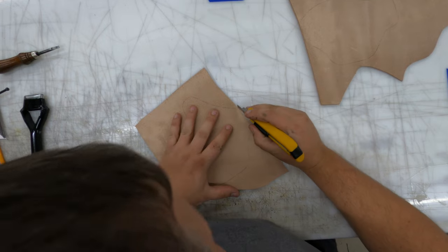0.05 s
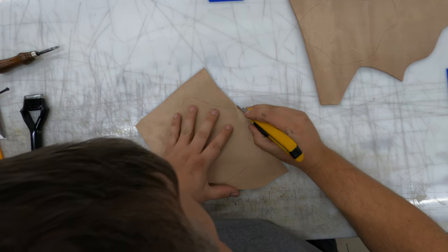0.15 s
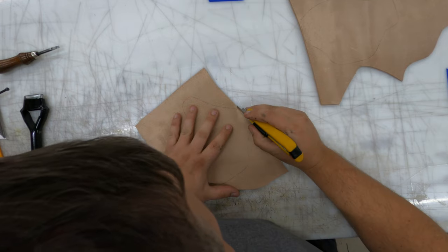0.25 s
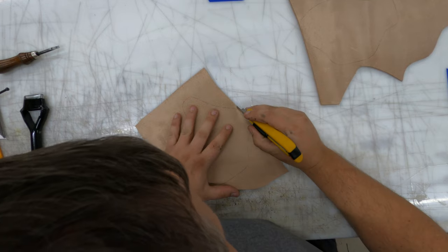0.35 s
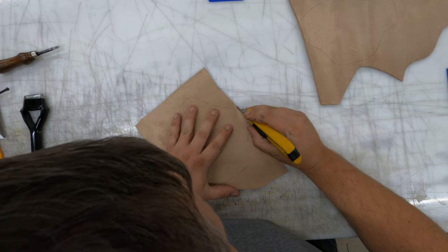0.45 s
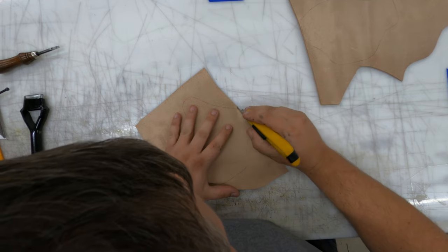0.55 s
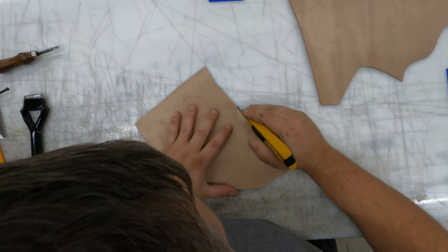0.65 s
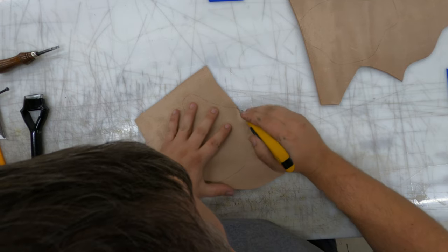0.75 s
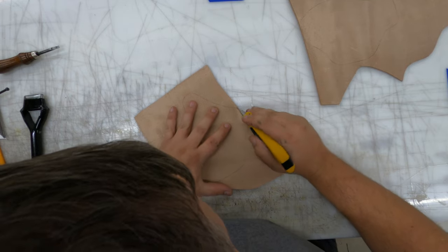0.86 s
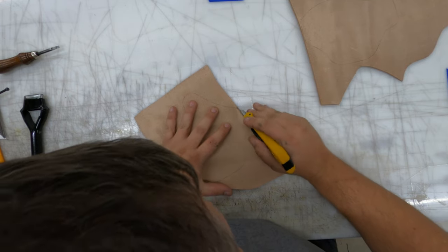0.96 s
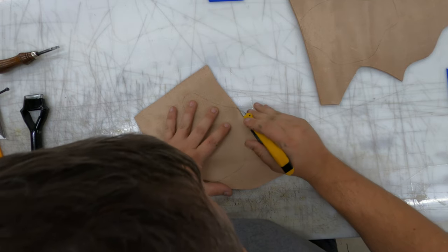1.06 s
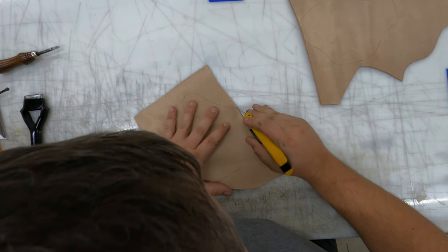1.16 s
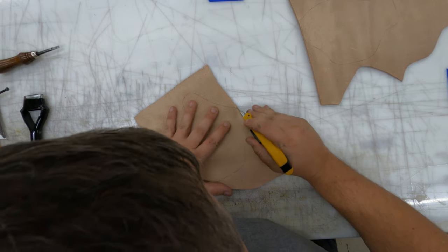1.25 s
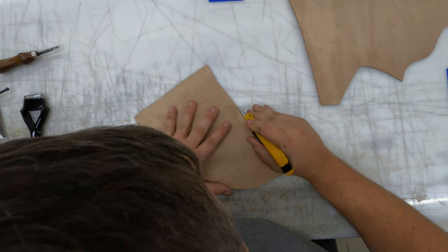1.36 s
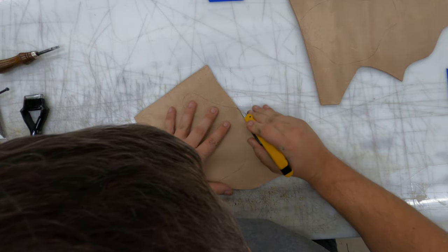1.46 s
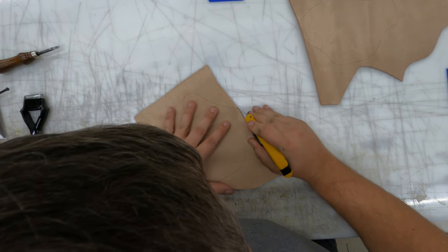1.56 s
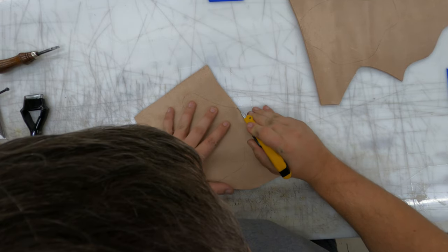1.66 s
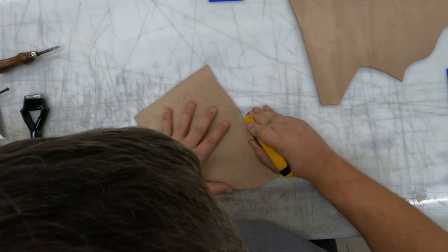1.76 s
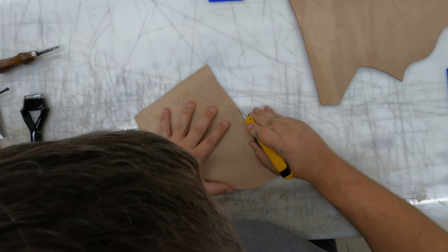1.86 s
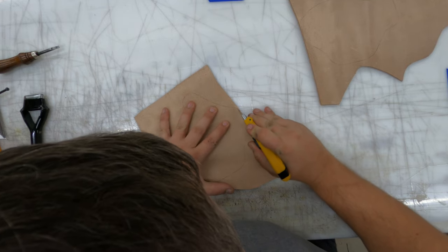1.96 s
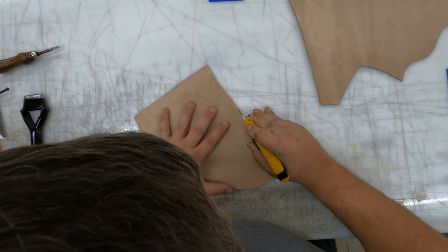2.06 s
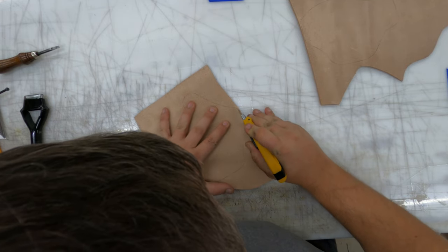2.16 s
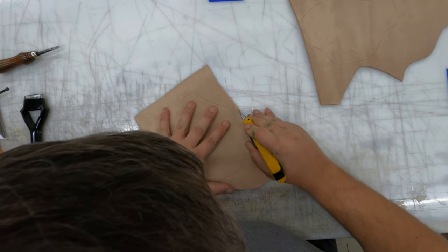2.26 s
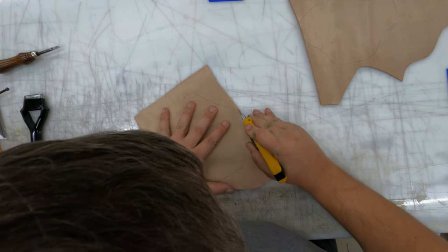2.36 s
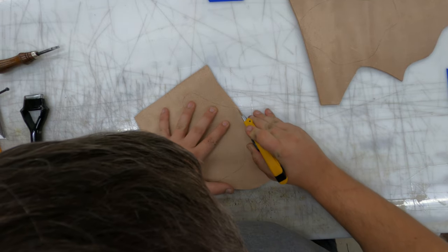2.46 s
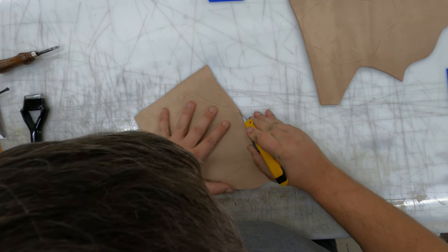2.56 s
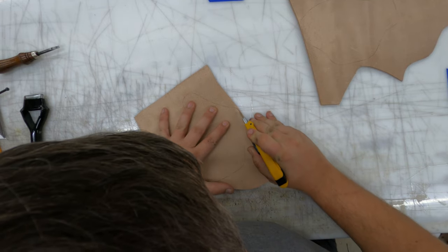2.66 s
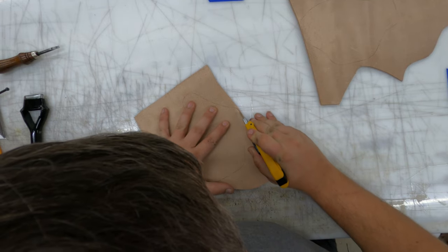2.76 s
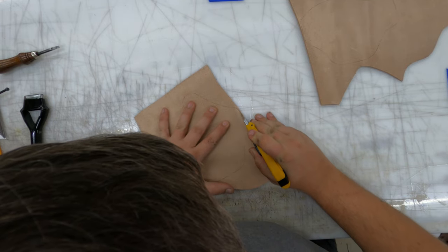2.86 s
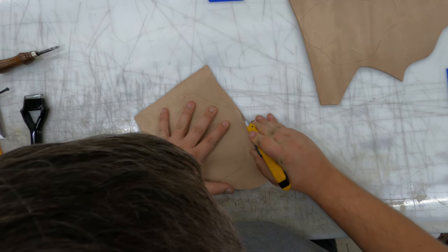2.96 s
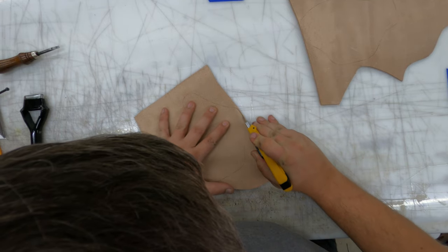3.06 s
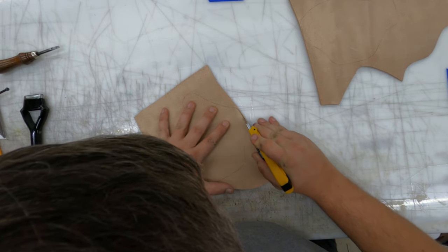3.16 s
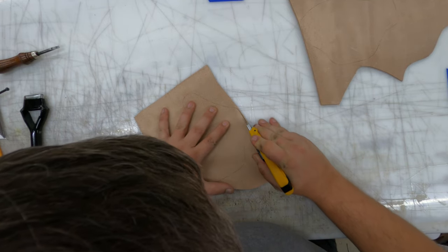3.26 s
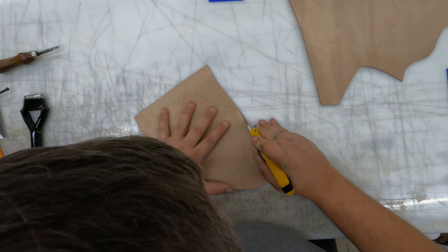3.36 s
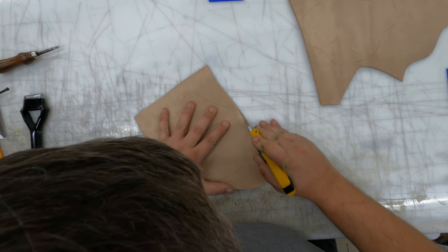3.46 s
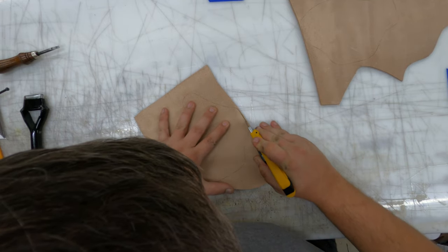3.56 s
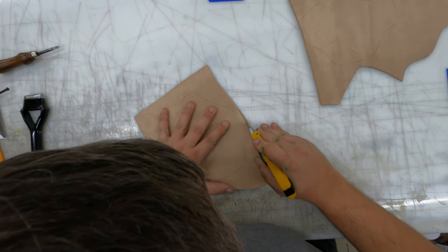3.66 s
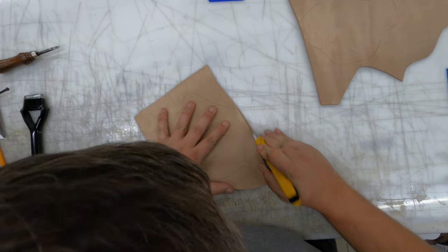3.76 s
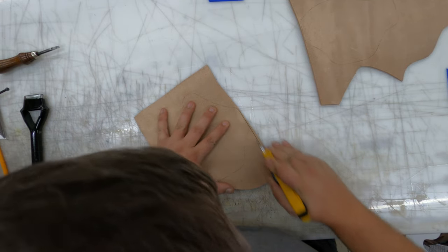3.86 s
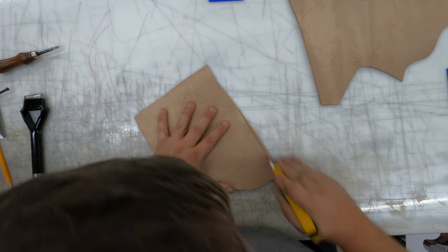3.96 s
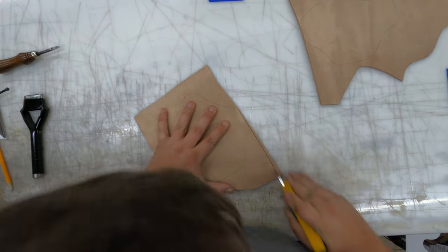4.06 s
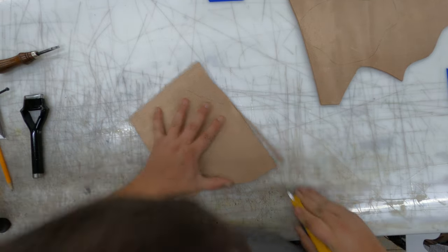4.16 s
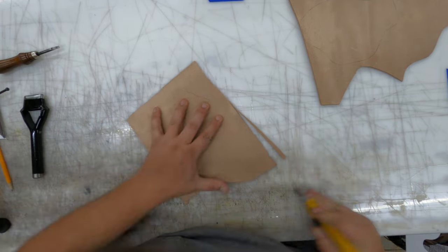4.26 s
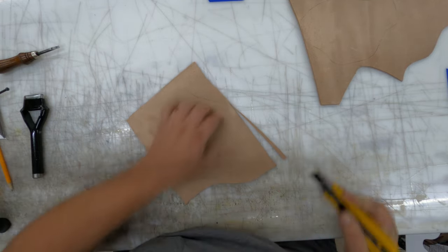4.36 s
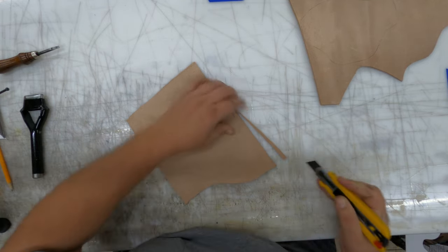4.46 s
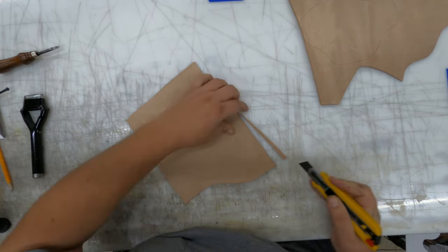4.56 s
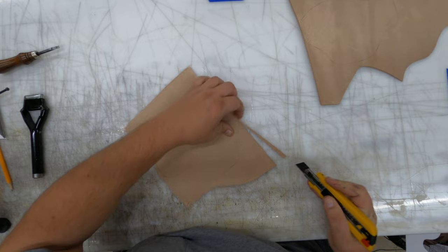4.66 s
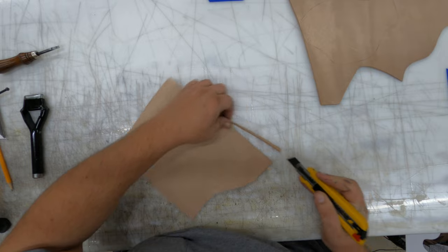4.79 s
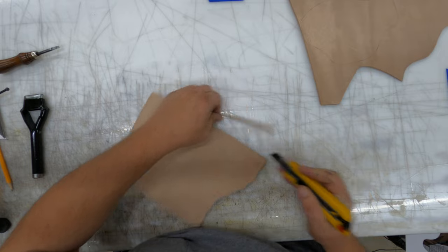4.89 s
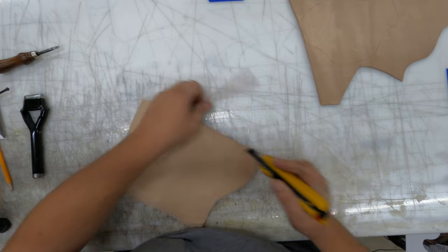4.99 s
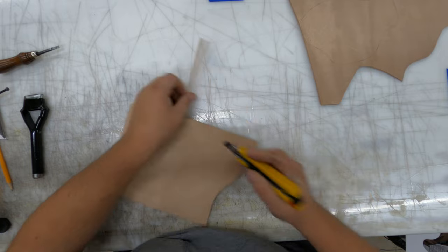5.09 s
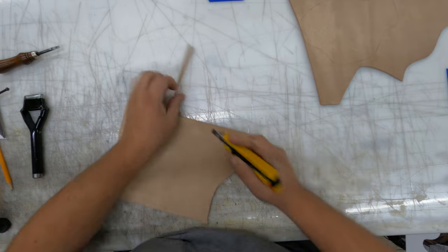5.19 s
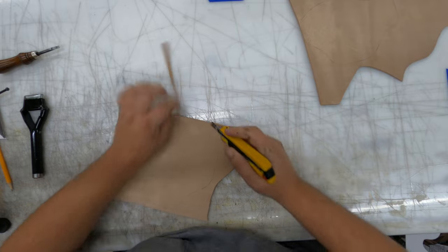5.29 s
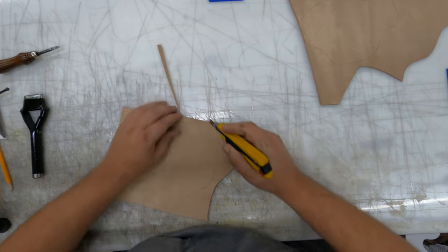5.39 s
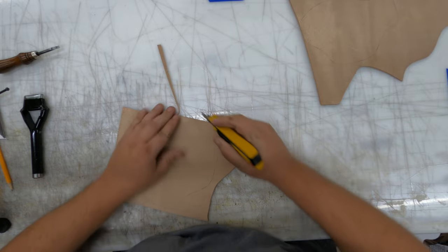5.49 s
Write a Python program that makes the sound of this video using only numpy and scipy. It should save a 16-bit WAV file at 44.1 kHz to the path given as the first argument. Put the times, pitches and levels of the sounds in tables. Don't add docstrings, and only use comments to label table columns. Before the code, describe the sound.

A quiet, dry workshop with steady soft hiss and faint low hum, heard very close. From 0.1 to 0.8 s a loose blade ticks lightly in its plastic handle, with faint rubbing. Firmer clicks and short woody knocks on the board come near 1.5 s, and a louder cluster at 1.8 to 1.9 s. It is nearly silent until about 2.5 s, when the blade bites leather: irregular gritty scratches in tiny jerks, crackling and slightly metallic, growing stronger to 3.7 s over a low bench shake. Then one continuous bright tearing rip runs from 3.7 to 4.2 s, ending in a brief skid. Light taps follow at 4.3 s, a soft palm thud with a second pat at 4.5 s, then leather sliding and rustling. Stiff-sheet knocks come at 4.85 to 5.3 s, with a sharp tap at 5.25 s, a softer hand bump, and faint rubbing to the end.

```python
import sys
import numpy as np
from scipy import signal
from scipy.fft import rfft, irfft, next_fast_len
from scipy.io import wavfile
from scipy.ndimage import uniform_filter1d, map_coordinates

SR = 44100
rng = np.random.default_rng(int(sys.argv[2]) if len(sys.argv) > 2 else 0)


def invert_db(x):
    u = np.asarray(x, float) / 20
    return 10 ** u


def store_pcm(level_fs):
    pcm = np.round(np.clip(level_fs, -1, 1) * 32767).astype(np.int16)
    wavfile.write(sys.argv[1], SR, np.atleast_2d(pcm).T)


N = 243873
T = np.arange(N) / SR
LEAVES_S = 4.175


def unit(x):
    return x / np.sqrt(np.mean(x ** 2))


def colour(x, spectrum):
    hz, db = np.transpose(spectrum)
    size = next_fast_len(len(x))
    f = np.maximum(np.arange(size // 2 + 1) * SR / size, 1)
    gain = invert_db(np.interp(np.log(f), np.log(hz), db))
    return irfft(rfft(x, size) * gain, size)[:len(x)]


def ring(x, hz, width_hz):
    b, a = signal.iirpeak(min(hz, .45 * SR), hz / width_hz, fs=SR)
    return signal.lfilter(b, a, x)


def band(x, lo_hz, hi_hz):
    return signal.sosfilt(signal.butter(2, (lo_hz, hi_hz), "band", fs=SR, output="sos"), x)


def in_band(x, lo_hz, hi_hz):
    return x / np.sqrt(np.mean(band(x, lo_hz, hi_hz) ** 2))


def grains(share, scatter_db):
    tick = rng.random(N) < share
    size = invert_db(scatter_db * rng.exponential(size=N))
    return unit(tick * rng.standard_normal(N) * size)


def walk(rate_hz):
    hold = int(SR / rate_hz)
    steps = np.repeat(rng.standard_normal(N // hold + 1), hold)
    return 1.3 * uniform_filter1d(steps, hold)[:N]


def swell(start_s, length_s, rise_db_s, fall_db_s):
    rise = (T - start_s) * rise_db_s
    fall = (start_s + length_s - T) * fall_db_s
    return invert_db(np.minimum(0, np.minimum(rise, fall)))


def delayed(x, lag_ms):
    return map_coordinates(x, [np.arange(N) - lag_ms * SR / 1000], order=3)


# pitch_hz, level_db (per Hz)
SHOP_TONE = [(20, 2), (45, -7), (90, 6), (160, 1), (240, -1), (400, -8), (800, -12), (1500, -15),
             (4000, -20), (16000, -24)]


def shop():
    return invert_db(-61.5) * unit(colour(rng.standard_normal(N), SHOP_TONE))


# start_s (the blow peaks about 0.97 length_cycles later), level_db, pitch_hz,
# length_cycles
THUDS = [
    (4.514, -31, 143, 0.99),
    (4.53, -48, 80, 1.3),
    (4.544, -50, 121, 2),
    (4.589, -39, 186, 1.12),
    (4.699, -67, 96, 1.2),
    (4.759, -65, 105, 1.3),
    (5.263, -42, 195, 1.46),
    (5.414, -44.5, 84, 0.8),
]


def thuds():
    out = np.zeros(N)
    for s, db, hz, cycles in THUDS:
        turn = (T - s) * hz - 0.97 * cycles
        bump = np.exp(-2 * (turn / cycles) ** 2 * 3.4)
        out -= invert_db(db + 2.1) * np.cos(2 * np.pi * turn) * bump
    return out


def rumble():
    shake = invert_db(1.5 * walk(25)) * rng.standard_normal(N)
    modes = ring(shake, 117.0, 45.0) + 0.51 * ring(shake, 184.0, 89.0) + 0.26 * ring(shake, 236.0, 92.0)
    return invert_db(-2.0) * in_band(modes, 51, 350)


# start_s, length_s, level_db, hiss_db and bench_db (both against the level)
SLIDES = [(0.613, 0.26, -66.5, -1.5, 1.5), (1.107, 0.068, -68, -3.5, 3), (1.54, 0.024, -61.5, -7, 0),
          (1.708, 0.078, -69.5, -2.5, 3), (1.835, 0.068, -64, -5, 10.5), (1.94, 0.027, -72, 4, 11),
          (4.34, 0.056, -63, 1, -7), (4.616, 0.058, -70, -2, 8.5), (4.713, 0.14, -53, -13, -1.5),
          (4.882, 0.014, -51, -17, -7), (4.962, 0.023, -59, -9, -0.5), (5.06, 0.028, -64.5, -5, 4),
          (5.12, 0.0082, -60.5, -15, -13), (5.141, 0.1, -67, 0, 1), (5.27, 0.026, -58, -9, -12),
          (5.325, 0.044, -71, 7, -8), (5.42, 0.0045, -67.5, -3.5, 8), (5.46, .09, -61, -2.5, -16)]
# pitch_hz, width_hz, level_db
LEATHER_RINGS = [(574, 220, -12), (874, 113, -3), (957, 11, -3), (1600, 210, -22)]


def slides():
    rub = grains(.15, 1.2) * invert_db(1.2 * walk(80))
    hide = sum(invert_db(db) * ring(rub, hz, 1.25 * width) for hz, width, db in LEATHER_RINGS)
    ringing = np.interp(T, [4.5, 4.7], invert_db([-9.0, 6.5]))
    low = (ringing * unit(hide) + unit(band(rub, 250, 2700))) / np.hypot(1, ringing)
    skin = grains(0.51, .8) * invert_db(2.0 * walk(40))
    whisper = np.interp(T, [4.5, 4.7], [.1, .9])
    hiss = in_band(band(skin, 3000, 20000), 4000, 14000) + whisper * unit(ring(skin, 8200., 2500.))
    bench = rumble()
    out = np.zeros(N)
    for s, length, db, hiss_db, bench_db in SLIDES:
        rubbing = low + invert_db(hiss_db) * hiss + invert_db(bench_db) * bench
        out += invert_db(db) * swell(s, length, 365, 286) * rubbing
    return out


# start_s, level_db, low_hz, high_hz, high_db (against the low ring)
HANDLE_KNOCKS = [(0.242, -62, 1030, 1710, -1), (0.4712, -49, 1440, 1880, 3), (0.469, -57, 270, 1020, -4),
                 (1.486, -43, 295, 1500, -7), (1.5318, -39.5, 710, 2160, 0), (1.531, -34.5, 310, 1880, -4),
                 (1.5545, -45.5, 330, 2150, 3.5), (1.8032, -35.5, 430, 1025, 1),
                 (1.832, -40, 400, 2010, -14), (1.852, -47, 332, 1290, 3.5), (1.864, -45, 640, 1240, -4),
                 (1.884, -56, 670, 1200, -8), (1.9086, -32.5, 800, 1510, 8.5),
                 (1.911, -31.5, 685, 1720, -9), (1.9145, -36, 720, 1510, -8), (1.8035, -39, 710, 2050, 2.5),
                 (1.91, -37, 374, 1114, 2)]
# start_s, level_db, low_hz, high_hz, high_db (against the low ring)
SHEET_KNOCKS = [(4.292, -49, 915, 1490, 1), (4.529, -55, 910, 1450, -17), (4.852, -42, 850, 1910, -7),
                (4.886, -34, 834, 1470, -21), (4.966, -43, 835, 1110, -19), (5.0568, -30.5, 756, 1600, -11),
                (5.115, -60, 854, 1450, 7), (5.244, -37, 806, 1750, -13), (5.251, -36, 817, 2180, 2),
                (5.26, -38.5, 480, 1700, -1), (5.289, -51, 394, 1590, -4)]


def knocks():
    handle_t60_s, sheet_t60_s = 0.02, 0.027
    out = np.zeros(N)
    rattle = unit(band(rng.standard_normal(N), 164, 1080))
    rows = [(handle_t60_s, *k) for k in HANDLE_KNOCKS] + [(sheet_t60_s, *k) for k in SHEET_KNOCKS]
    for t60, s, db, low_hz, high_hz, high_db in rows:
        t60 = t60 * 2 ** (-(db + 40) / 22)
        u = np.maximum(T - s, 0)
        rise = 1 - np.exp(-(u / 0.00097) ** 2)
        fade = invert_db(-60 * u / t60)
        lower = np.sin(2 * np.pi * low_hz * u)
        upper = invert_db(high_db + 5.0) * fade * np.sin(2 * np.pi * high_hz * u)
        out += invert_db(db + 6.5) * rise * fade * (lower + upper + 0.36 * rattle)
    return out


# start_s, level_db, pitch_hz, top_db (against the level)
BLADE_CLICKS = [(0.123, -48, 3140, -17), (0.1963, -45, 3000, 1), (0.2425, -38, 3100, -6.5),
                (0.3384, -50, 3560, -24), (0.4417, -49, 8200, 7), (0.4711, -31.5, 5060, 1.5),
                (0.603, -42, 1950, -26), (0.7652, -44, 3020, -13), (1.3608, -52, 2320, -11),
                (1.4874, -34, 1450, -16), (1.5293, -30.5, 1540, -1), (1.5313, -28, 1930, -21),
                (1.5542, -33.5, 2160, -12), (1.8028, -24, 2080, -3.5), (1.8071, -32, 1850, -9),
                (1.834, -34, 2010, -1), (1.8478, -43, 4700, 5), (1.8517, -34, 1500, -13),
                (1.8644, -42, 1850, -17), (1.8853, -53, 1510, -14), (1.901, -39.5, 5200, 13),
                (1.9078, -21.5, 3600, -27), (2.0123, -43, 5270, -7), (2.174, -52, 1700, -2.5),
                (2.391, -53, 8250, -4)]
# start_s, level_db, pitch_hz, top_db (against the level)
TAPS = [(4.269, -40.5, 2150, -3), (4.2933, -34, 3070, -9), (4.4508, -54, 2670, -17),
        (4.5147, -49.5, 5200, -9), (4.527, -52, 4400, -6), (4.5394, -52, 4300, -12),
        (4.803, -39, 2100, -11), (4.873, -45, 3100, -1), (4.7587, -35, 1640, -12),
        (4.8551, -33.5, 1780, -0.5), (4.934, -40, 3300, -16), (5.1175, -41, 1520, -9),
        (5.2511, -18, 2020, -40), (5.2544, -28, 2540, -28), (5.2598, -36, 1600, -25)]


def clicks():
    size = 2048
    out, u = np.zeros(N + size), np.arange(size) / SR
    for s, db, hz, top_db in BLADE_CLICKS + TAPS:
        after_cut = s > LEAVES_S
        rattle_ms = 2.52 - 0.0662 * (db + 47)
        burst = rng.standard_normal(size) * (1 - np.exp(-u / 0.0001)) * np.exp(-u * 1000 / rattle_ms)
        burst[30] += 3.2 if after_cut else 1.3
        bright = band(burst, 1120, 5940) + 3.2 * ring(burst, hz, hz / 11)
        crack = band(burst, 4560, 9500 if after_cut else 13500)
        click = bright / np.abs(bright).max() + invert_db(top_db) * crack / np.abs(crack).max()
        i = int(s * SR)
        out[i:i + size] += invert_db(db - 2.0) * click
    return out[:N]


# start_s, level_db, length_ms
SLIPS = [(2.499, -48, 13), (2.5987, -41, 12), (2.6411, -36.5, 9.7), (2.6693, -40, 18), (2.697, -44, 14),
         (2.719, -43, 9.2), (2.836, -49, 14), (2.8745, -38, 6.8), (2.8836, -35, 7.7), (2.9274, -40, 17),
         (2.953, -37.5, 11), (2.9844, -46, 10), (2.9986, -39, 16), (3.034, -31, 9.6), (3.0594, -43, 47),
         (3.087, -38, 9.8), (3.119, -41, 32), (3.1486, -41.5, 22), (3.1765, -32.5, 10.3),
         (3.2316, -38.5, 19), (3.274, -38.5, 10.6), (3.3558, -39.5, 9.8), (3.413, -41.5, 19),
         (3.484, -38, 26), (3.538, -36, 15), (3.5764, -41.5, 17), (3.6296, -38.5, 17), (3.6485, -36, 5.9),
         (3.6721, -43, 23), (3.714, -30.5, 11.5)]


def slip_drag():
    out = np.zeros(N)
    for s, db, ms in SLIPS:
        u = np.maximum(T - s, 0) * 1000
        out += invert_db(db - 14.5) * (1 - np.exp(-(u / 1.22) ** 2)) * np.exp(-(u / ms) ** 2)
    return out


# start_s, length_s, level_db
PUSHES = [
    (2.462, 0.27, -63.5),
    (2.844, 0.16, -61.5),
    (3.037, 0.23, -57),
    (3.354, 0.008, -59),
    (3.415, 0.027, -58),
    (3.486, 0.018, -57),
    (3.543, 0.018, -55),
    (3.62, 0.016, -60),
]
# time_s, level_db
STROKE = [
    (3.62, -75),
    (3.67, -59.5),
    (3.78, -40.5),
    (3.95, -40),
    (4.172, -42),
    (4.18, -45.5),
    (4.2, -42),
    (4.262, -64.5),
    (4.28, -77),
]


def push_drag():
    pushes = sum(invert_db(db) * swell(s, length, 602, 604) for s, length, db in PUSHES)
    return pushes + invert_db(np.interp(T, *np.transpose(STROKE), -150, -150))


# pitch_hz, width_hz, level_db
KNIFE_RINGS = [(716, 80, -2), (877, 45, -5), (1130, 60, -3), (1510, 190, 0), (1840, 70, -2), (2050, 90, -3),
               (2700, 260, -5), (3470, 170, -7), (4220, 200, -10), (5220, 210, -12), (5880, 200, -13),
               (6500, 300, -17), (7700, 350, -13), (8600, 130, -6), (9560, 120, -13), (10900, 220, -12),
               (13000, 300, -15), (13700, 350, -15)]
# pitch_hz, level_db (per Hz)
TEAR_TONE = [(300, -1.5), (1500, 2.5), (3000, 4), (6000, 1.5), (8500, 6), (10500, -0.5), (13000, 1),
             (16000, -6)]


def tearing(speed):
    uneven = invert_db(0.68 * walk(120) + 0.84 * walk(400))

    def snaps():
        lone, dense = grains(.08, 1.7), grains(.25, 1.1)
        return (np.sqrt(1 - speed) * lone + np.sqrt(speed) * dense) * uneven

    fibres, torn = snaps(), snaps()
    modes = 0.65 * speed * ring(torn, 940.0, 98.0)
    for k, (hz, width, db) in enumerate(KNIFE_RINGS):
        modes = modes + (-1) ** k * invert_db(db) * ring(fibres, hz, width)
    free = np.interp(T, [3.7, 3.95], invert_db([-8.0, 2.0]))
    return (unit(modes) + free * unit(colour(torn, TEAR_TONE))) / np.hypot(1, free)


# time_s, lag_ms
HAND_ECHO = [(3.76, 0.5), (3.87, 0.39), (4.0, 0.24), (4.05, 0.145), (4.12, 0.06)]


def echoes(voice, speed):
    hand_ms = np.interp(T, *np.transpose(HAND_ECHO)) * invert_db(.3 * walk(25))
    hand_share = np.interp(T, [3.7, 3.95], [.15, .55])
    voice = voice + hand_share * delayed(band(voice, 2500, 19000), hand_ms)
    board_ms = .66 * invert_db(.8 * walk(14))
    return voice + speed * .3 * delayed(band(voice, 2200, 19000), board_ms)


def cut():
    lean = push_drag()
    steady = np.interp(T, [3.62, 3.76], invert_db([-4.0, -.1]))
    drag = np.hypot(slip_drag(), steady * lean)
    speed = np.interp(T, [3.66, 3.8], [0, 1])
    voice = echoes(tearing(speed), speed)
    top = colour(voice, [(4000, -30), (7500, 0)])
    low = in_band(band(voice - top, 300, 20000), 1000, 5000)
    hiss_db = np.interp(T, [2.6, 2.6 + 0.36, 3.81, LEAVES_S, LEAVES_S + 0.0037], [-7, -4.5, -2.5, 2, -6.5])
    hiss = in_band(top, 6500, 15000) * invert_db(hiss_db)
    calmer = np.interp(T, [3.85, 4.1], invert_db([-1.5, -8.0]))
    shake = invert_db(-24) * np.maximum(lean ** 0.46 - .012, 0) * calmer
    return drag * (low + hiss) + shake * rumble()


def scene():
    near = thuds() + slides() + knocks() + clicks() + cut()
    u = np.arange(int(.3 * SR)) / SR
    tail = band(rng.standard_normal(len(u)), 215, 2500) * invert_db(-60 * u / 0.24) * (u > .004)
    room = signal.fftconvolve(near, tail / np.linalg.norm(tail))[:N]
    mono = near + invert_db(-20.5) * room + shop()
    return np.array([mono, mono])


def roll_off(x):
    return signal.sosfilt(signal.butter(12, 16480, fs=SR, output="sos"), x)


def record(dry):
    hiss_db, top_hz = -67.0, 15700
    wet = dry + invert_db(hiss_db) * rng.standard_normal(dry.shape)
    wet = signal.sosfilt(signal.ellip(10, .3, 70, top_hz, fs=SR, output="sos"), wet)
    return roll_off(wet)


dry = scene()
out = record(dry)
store_pcm(out)
```